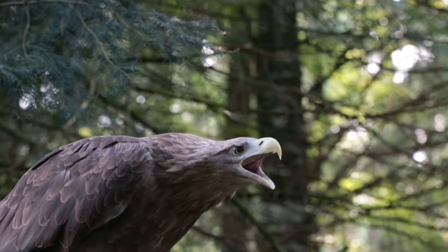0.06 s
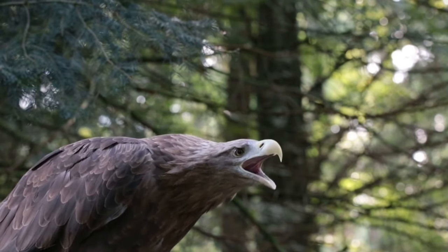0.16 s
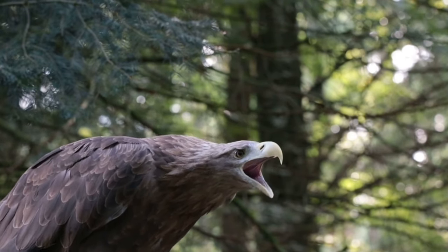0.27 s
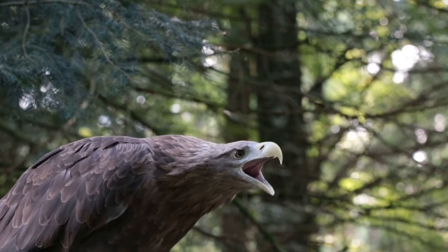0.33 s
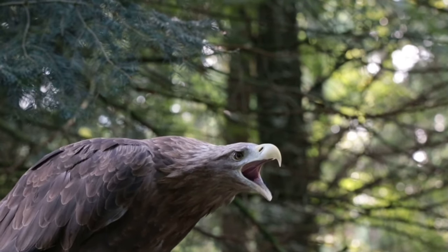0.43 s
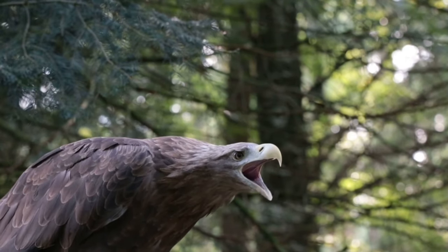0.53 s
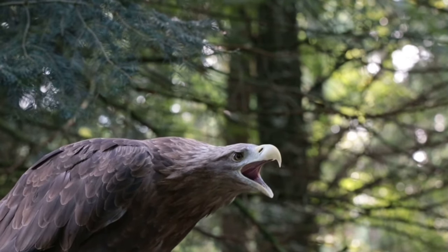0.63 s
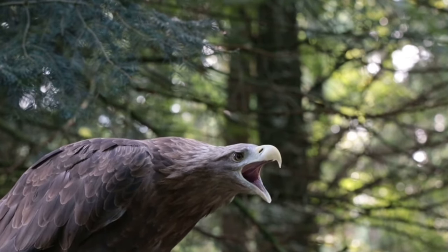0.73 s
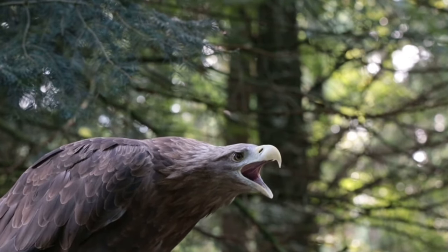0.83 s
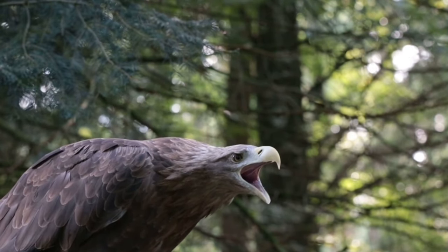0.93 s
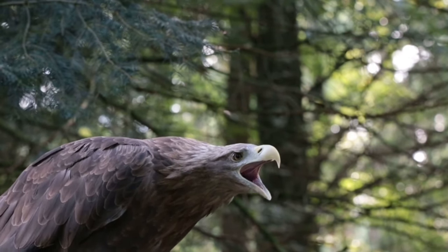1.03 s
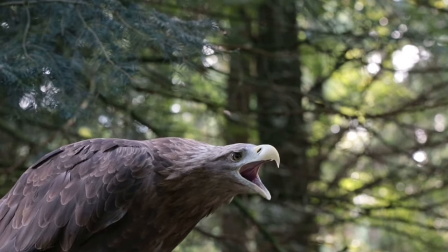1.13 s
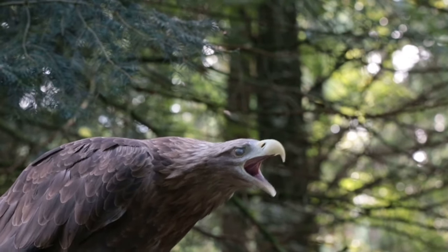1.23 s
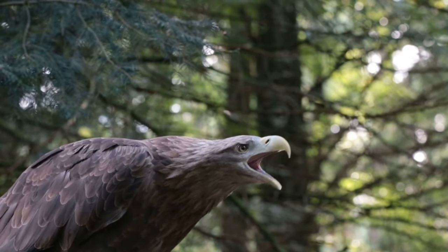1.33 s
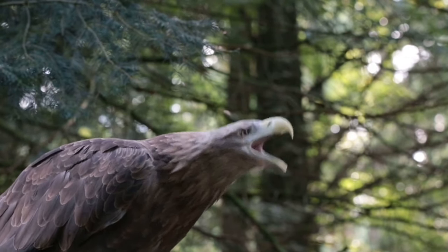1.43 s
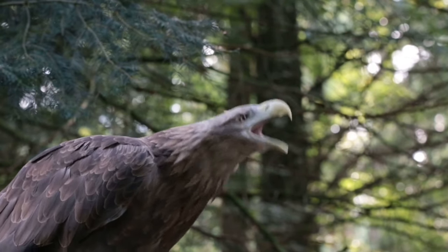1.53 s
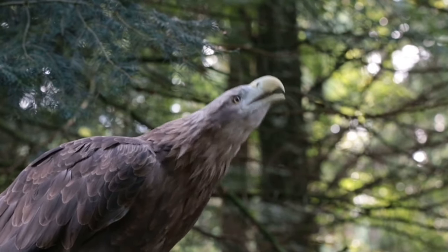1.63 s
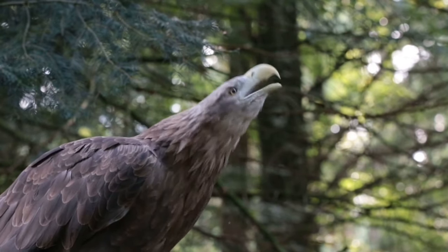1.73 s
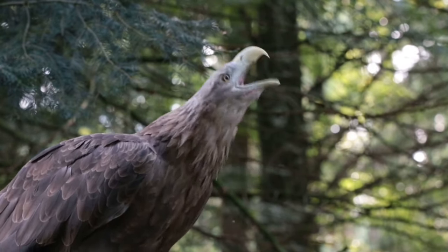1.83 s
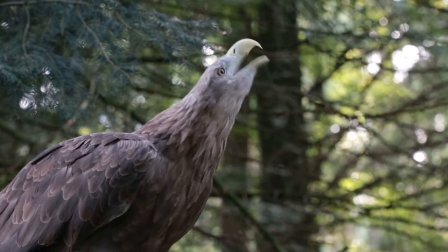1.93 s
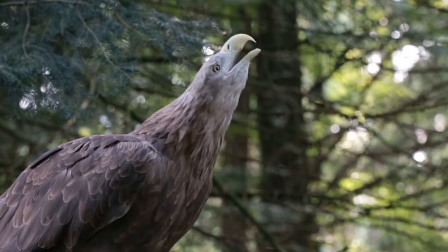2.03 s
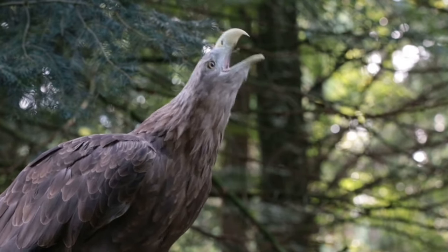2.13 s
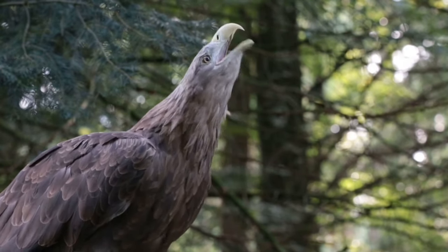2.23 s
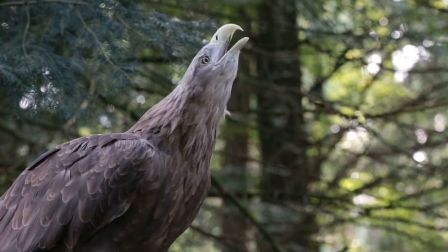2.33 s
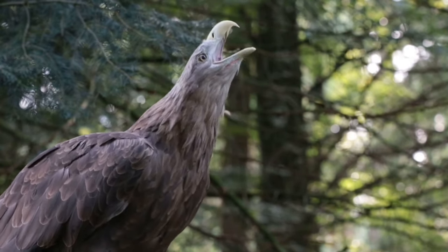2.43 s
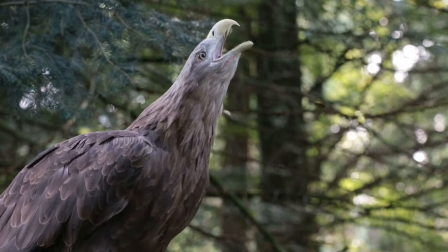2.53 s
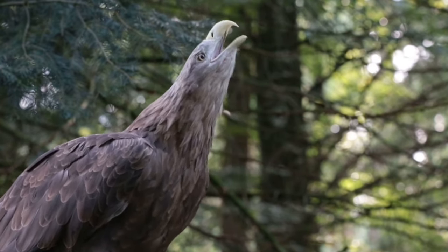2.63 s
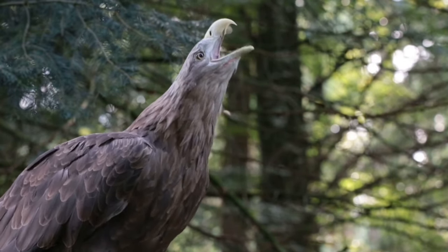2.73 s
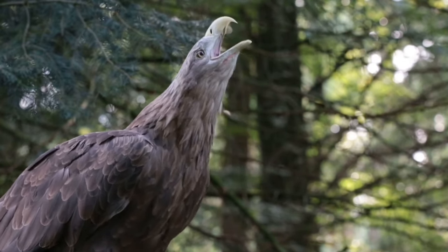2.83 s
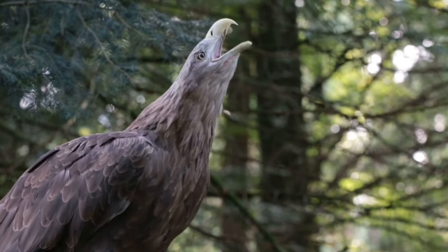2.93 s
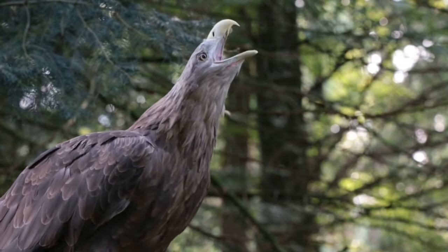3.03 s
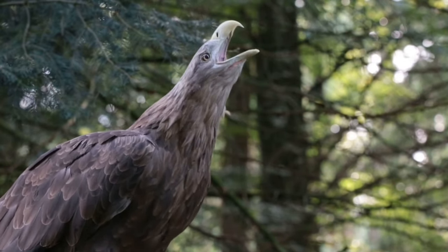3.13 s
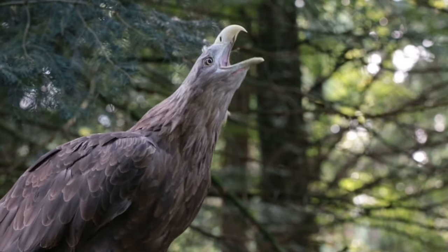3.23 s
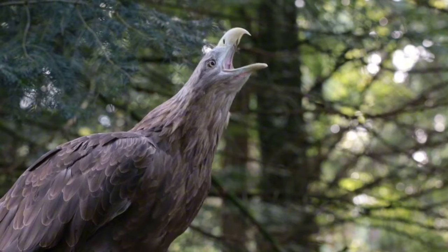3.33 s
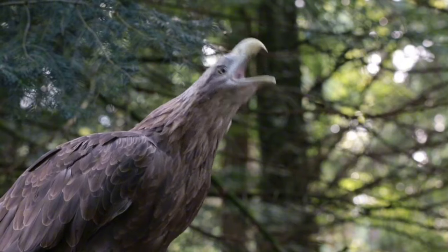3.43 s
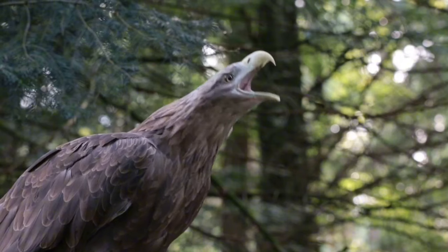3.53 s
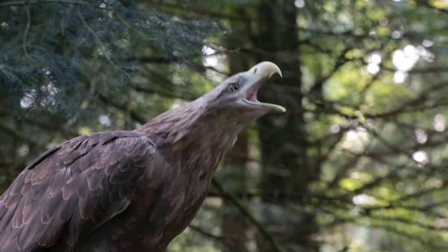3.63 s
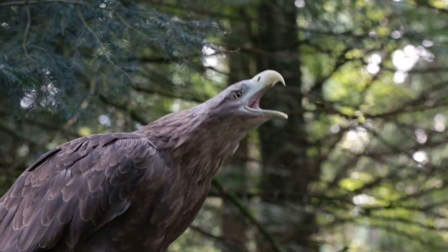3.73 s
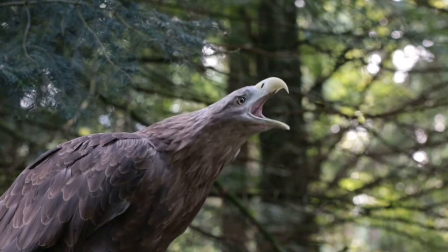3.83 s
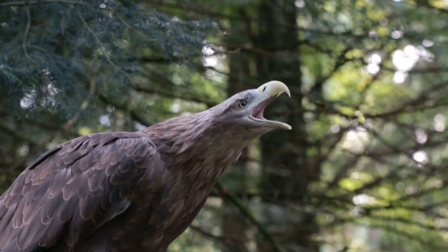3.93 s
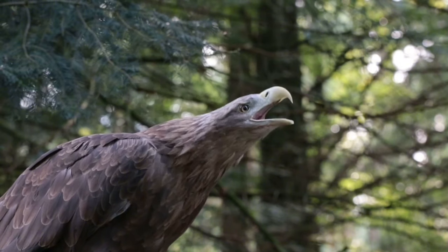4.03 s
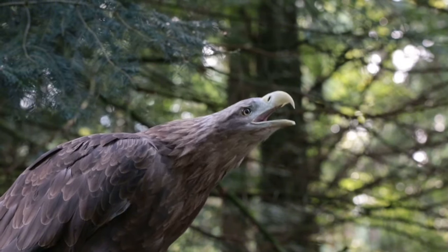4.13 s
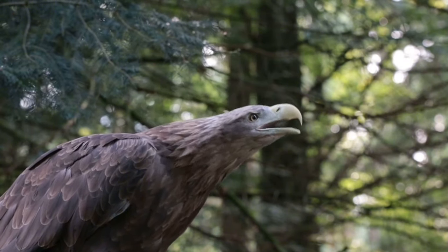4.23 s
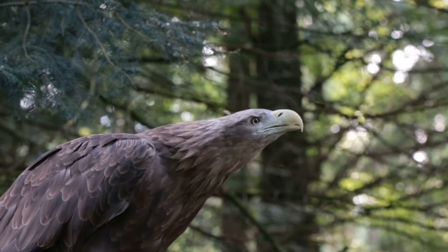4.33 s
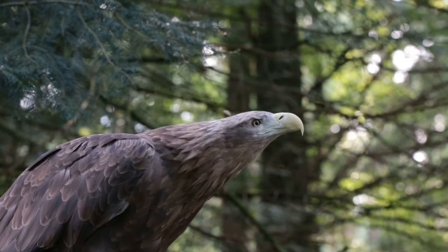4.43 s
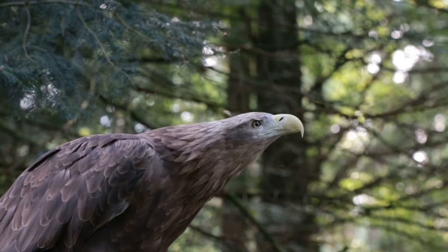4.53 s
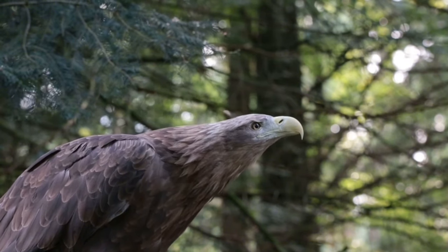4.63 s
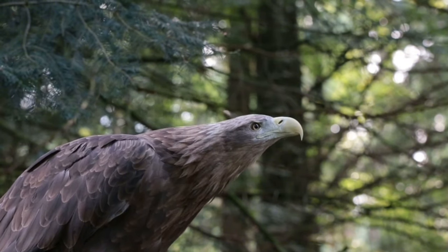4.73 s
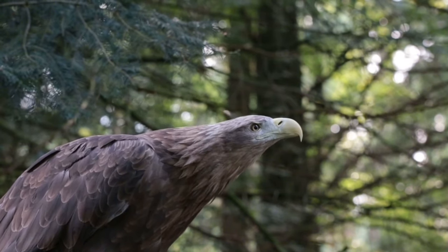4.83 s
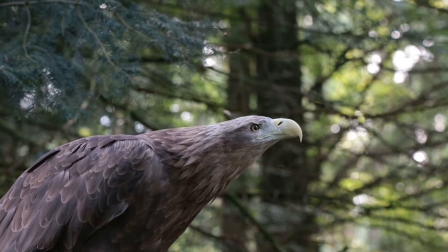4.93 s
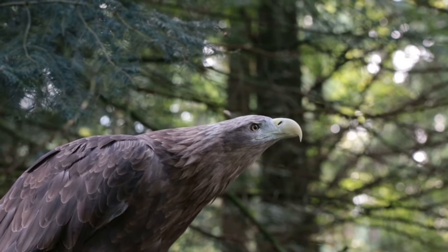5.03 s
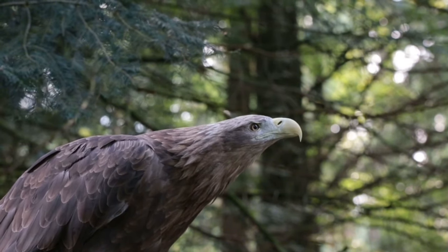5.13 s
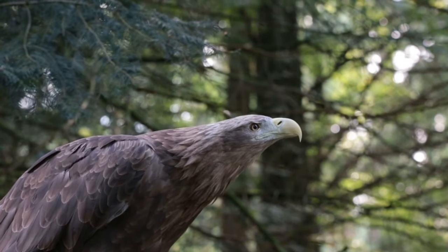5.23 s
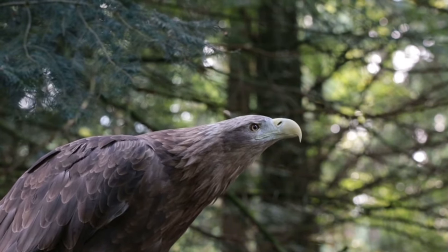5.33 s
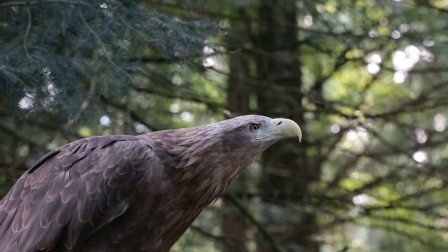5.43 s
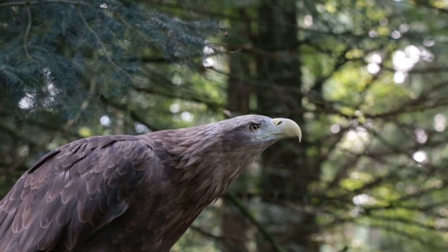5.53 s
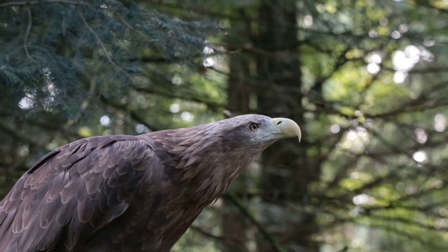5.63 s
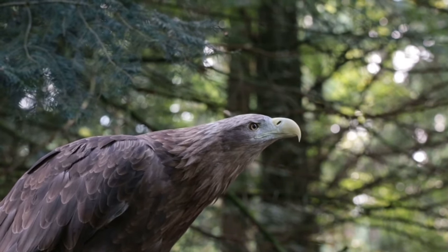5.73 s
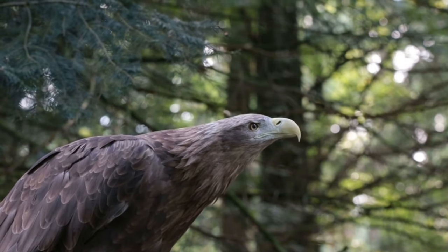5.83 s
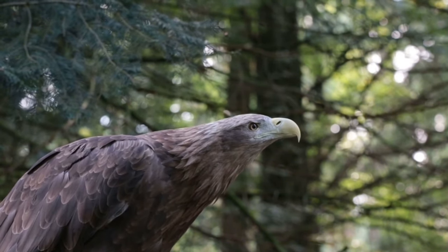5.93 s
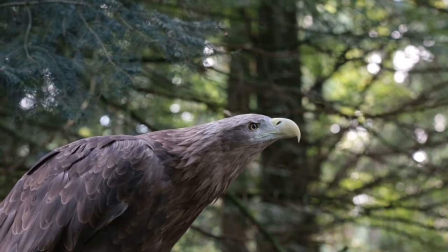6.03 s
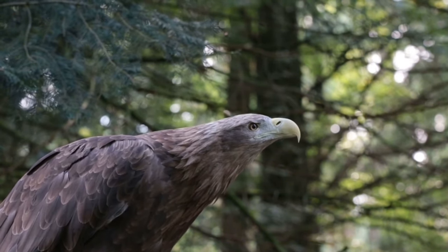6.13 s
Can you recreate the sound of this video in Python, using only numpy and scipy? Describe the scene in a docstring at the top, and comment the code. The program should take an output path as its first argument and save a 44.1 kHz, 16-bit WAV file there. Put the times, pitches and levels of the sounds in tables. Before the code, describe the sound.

Close to the microphone, a large bird of prey is already calling in a steady series of shrill, raspy yelps, each ringing briefly among the trunks. The notes slow slightly and grow hoarser midway, then finish with one quiet croak. The last couple of seconds hold only the soft hush of the wood, a very faint high insect and a few tiny dry scuffs.

```python
"""Eagle calling in a conifer wood

A perched eagle gives a run of sharp notes, already under way, and ends with a low croak. In each note
the vibrating syrinx climbs in a wavering squeal, breaks into purer yelps, then slackens into a rattle
of pulses that ring the throat. The beak's opening shapes the timbre, and the trees scatter the calls
into an echo. Afterwards come a few faint ticks and a thin insect over the hush of the wood."""
import sys
import numpy as np
from scipy import signal
from scipy.fft import rfft, irfft, next_fast_len
from scipy.io import wavfile
from scipy.ndimage import map_coordinates

SR = 44100
rng = np.random.default_rng(int(sys.argv[2]) if len(sys.argv) > 2 else 0)


def dump(signal):
    """Clip the signal to [-1, 1] and save it as 16-bit WAV at the path in sys.argv[1]."""
    limited = np.clip(np.atleast_2d(signal).T, -1, 1)
    pcm = np.round(limited * 32767).astype(np.int16)
    wavfile.write(sys.argv[1], SR, pcm)


N = 272083
SIZE = next_fast_len(N + SR)  # sounds begun before time zero wrap round from the spare end
HZ = np.fft.rfftfreq(SIZE, 1 / SR)
TOP_HZ = 15750

# Levels are relative within each table. "shut" and "open" mean a beak nearly shut and wide open.
HUSH_SPECTRUM = [(15, -72), (25, -42.5), (59, -25.5), (173, -31.5), (209, -14), (274, -16.5), (368, -8),
                 (567, -5), (631, 3), (762, 0.5), (1900, -16.5), (3440, -22.5), (7300, -33), (10100, -33),
                 (15500, -46)]  # distant air: frequency_hz, density_db
HUSH_COHERENCE = [(60, 0.84), (180, 0.34), (550, 0.56), (1650, 0.87), (4970, 0.31), (15000, 0.7)]  # likeness of left and right: frequency_hz, correlation
INSECT_LEVEL = [(4.2, -83), (4.65, -91), (4.85, -82.5), (5.4, -83), (5.55, -96), (6.15, -97.5)]  # insect's loudness: time_s, level_db
WOOD_DECAY = [(200, .5), (700, 0.25), (1500, 0.78), (3000, 0.63), (5000, 0.67), (10000, 0.21)]  # reverberation time of the trunks: frequency_hz, t60_s
WOOD_SPECTRUM = [(150, -13), (600, -2.5), (1500, -3.5), (3200, -2.5), (5000, -7.5), (9000, 7), (15000, -13)]  # colour of their echo: frequency_hz, gain_db
STEREO_BALANCE = [(300, 1), (800, 1), (1300, 4), (1700, 2), (2400, -1), (4400, -2.5), (8000, -1.5),
                  (15000, 0.5)]  # direct sound, left over right: frequency_hz, gain_db
STEREO_PHASE = [(200, 0), (1200, 0.014), (1700, -0.68), (3000, 1.6), (4800, -1.4), (8000, 0.65),
                (15000, 0.94)]  # direct sound, lead of the left: frequency_hz, phase_rad
TICKS = [(4.787, 0.0051, -62, 2390, 0.44), (4.859, 0.032, -59.5, 2026, 0.8), (5.457, 0.018, -52, 744, 1.16),
         (5.467, 0.0097, -55, 990, 1.6)]  # dry scuffs: start_s, length_s, level_db, centre_hz, width_octaves

BEAK_OPENING = [(.2, 1), (1.45, 0.89), (1.63, 0.36), (2, 0.07), (2.9, 0.13), (3.23, 0.32), (3.55, 0.6),
                (3.8, .85), (4.08, 0.89), (4.35, 0.06)]  # 0 is shut, 1 is open: time_s, opening_share
RASP_SPECTRUM = [(100, -49.5), (600, -13.5), (1500, 3), (3500, 3), (5000, -8), (8000, -20.5), (10500, -30),
                 (15500, -34)]  # breath noise: frequency_hz, density_db
HOARSENESS = [(.2, -19), (.5, -17.5), (1.45, -13.5), (1.75, -11.5), (3.2, -10.5), (3.8, -9.5), (4.1, -19)]  # breath noise in proportion to the voice: time_s, level_db
RATTLES = [(.487, 0.041, -38), (.72, 0.041, -42.5), (.956, 0.043, -39.5), (1.197, 0.035, -36.5),
           (1.433, 0.033, -36), (1.734, 0.041, -32), (2.054, 0.044, -36), (2.356, 0.058, -37),
           (2.661, 0.057, -37), (2.963, .05, -36), (3.255, 0.044, -34), (3.576, 0.031, -34.5),
           (3.824, 0.015, -34.5), (4.082, 0.014, -33.5)]  # pulse trains that end the notes: start_s, length_s, level_db
CROAK = [(4.362, 0.0266, -62.5), (4.397, 0.032, -50.5), (4.425, 0.008, -47)]  # a soft start and two pushes: start_s, length_s, level_db
RATTLE_ENVELOPE = [(0, -1.5), (.3, -0.5), (.55, 2), (.85, -1), (1, -4.5), (1.25, -19), (1.5, -89.5)]  # swell and fade of a pulse train: length_share, level_db
PULSE_SPECTRUM = [(30, -49), (150, -41), (210, -21.5), (450, -12), (850, 1), (1250, 1), (1800, -5.5),
                  (2500, -16), (3600, -19.5), (4800, -32.5), (8000, -44.5), (15000, -70)]  # one throat pulse: frequency_hz, level_db
RATTLE_FORMANTS = [(888, 100, 4.5), (1368, 69, 8.5), (1682, 320, 10), (3160, 300, 7.5)]  # throat resonances: centre_hz, width_hz, boost_db
CROAK_FORMANTS = [(832.3, 210, 8), (1380, 140, 11), (1847, 280, 19.5), (3350, 880, 18), (6300, 4000, -24)]  # the same, beak nearly shut: centre_hz, width_hz, boost_db

SQUEAKS = [(1.711, 0.0096, -35), (2.03, .011, -41.5)]  # whistles leading into a yip: start_s, length_s, level_db
YIPS = [(.513, .0036, 1722, -16.5), (.75, 0.0023, 1797, -15), (.99, .0039, 1697, -23),
        (1.225, .005, 1740, -20.5), (1.464, 0.0023, 1773, -17.5), (1.723, 0.01, 1818, -15),
        (2.042, .0046, 1872, -18.5), (2.049, 0.0061, 1770, -25.5), (2.344, .0044, 1765, -16),
        (2.35, .006, 1770, -23.5), (2.647, 0.013, 1765, -21.5), (2.95, 0.015, 1716, -18),
        (3.238, 0.019, 1578, -20), (3.264, .0054, 1730, -25.5), (3.57, .0074, 1607, -19),
        (3.592, .0053, 1630, -22.5)]  # brief high breaks near a rattle: start_s, length_s, pitch_hz, level_db
SLURS = [(.235, 0.026, 1310, -32), (.489, .011, 1480, -27.5), (.727, 0.012, 1500, -31),
         (.966, 0.012, 1595, -25.5), (1.205, 0.0081, 1580, -25), (1.443, 0.0061, 1650, -23),
         (3.822, .017, 1395, -33), (4.08, .016, 1397, -33)]  # the voice catches and slides down: start_s, length_s, pitch_hz, level_db
# Squeals, each topped by a yelp: start_s, climb_s, top_pitch_hz, yelp_length_s, yelp_level_db
NOTES = [(-.105, 0.032, 1544, .029, -24), (0.175, .03, 1381, 0.038, -24.5), (.435, 0.037, 1592, 0.017, -21),
         (0.674, 0.035, 1625, .013, -21), (.913, 0.033, 1590, 0.016, -19), (1.151, .033, 1608, .016, -17.5),
         (1.387, .031, 1594, 0.018, -18.5), (1.624, 0.03, 1299, .01, -28), (1.962, 0.034, 1646, .012, -17),
         (2.292, .03, 1662, .014, -16), (2.595, .028, 1627, 0.018, -17), (2.898, 0.03, 1591, 0.02, -17.5),
         (3.192, .029, 1602, 0.018, -15.5), (3.514, 0.032, 1604, 0.025, -18.5),
         (3.758, .029, 1580, 0.041, -21), (4.011, 0.028, 1560, 0.049, -23)]
YELP_ARCH = [(1, 0.96), (1, 0.98), (0.95, .935)]  # start, middle and end pitch against the top: shut_ratio, open_ratio
OVERTONE_SPECTRUM = [(4000, 4.5), (5200, 9), (6300, -4), (8000, -9), (9500, -23), (11000, -43),
                     (15500, -39)]  # envelope of harmonics above the 3rd: frequency_hz, level_db
# The 2nd, 3rd and all higher harmonics against the fundamental, a row each: shut_db, open_db
YIP_TONE = [(-7.5, -2), (-29, -24), (-35.5, -35)]
SLUR_TONE = [(-16, -0.5), (-20, 1.5), (-38, -10)]
YELP_TONE = [(-13.5, -2), (-41, -10.5), (-41.5, -17.5)]
SQUEAL_TONE = [(-15, 3), (-17.5, 2), (-43, -10)]

# Pitch contours: start, middle, end
SQUEAK_HZ = (4540, 4150, 3800)
YIP_ARCH, SLUR_FALL = (1, .99, .95), (1, .92, .73)  # ratios to pitch_hz
# Settings that follow the beak: shut, open
AIR_TO_TREES_DB = (11, 2.5)  # the head is raised when the beak is shut, throwing hiss into the trees
YELP_SNAP_DB, YELP_BRIGHTEN_DB, YELP_SKEW = (-1.5, 7.5), (-2, 6.5), (1.3, .7)
SQUEAL_WAVER, SQUEAL_ONSET_DB, SQUEAL_TILT_DB = (.103, .042), (-15.5, -2), (-7.5, 4.5)


def amp(db):
    """Amplitude ratio of a level in decibels."""
    return 10 ** (np.asarray(db) / 20)


def unit(x):
    """Normalisation to an rms of 1."""
    return x / np.sqrt(np.mean(x ** 2) + 1e-20)


def curve(points, x):
    """Linear interpolation in a two-column table."""
    return np.interp(x, *np.transpose(points))


def along(points, hz):
    """Interpolation on a logarithmic frequency axis."""
    knots_hz, values = np.transpose(points)
    return np.interp(np.log(hz + 1), np.log(knots_hz + 1), values)


def filtered(x, response):
    """Circular convolution: the spectrum of x times a response given on HZ."""
    return irfft(rfft(x, SIZE) * response, SIZE)


def smoothed(x, decay_s):
    """A first-order low-pass gives every impulse an exponential tail."""
    return filtered(x, 1 / (1 + 2j * np.pi * HZ * decay_s))


def minimum_phase(gain):
    """Folding the cepstrum gives a causal response with this gain."""
    cepstrum = irfft(np.log(gain), SIZE)
    cepstrum[1:SIZE // 2] *= 2
    cepstrum[SIZE // 2 + 1:] = 0
    return np.exp(rfft(cepstrum))


def band_gain(response):
    """The rms gain of a response in the band of the calls."""
    return np.sqrt(np.mean(abs(response[:, (HZ > 1000) & (HZ < 4000)]) ** 2))


def wobble(count, rate_hz):
    """Smooth random modulation: a spline through rate_hz knots a second."""
    return map_coordinates(rng.standard_normal(4096), [np.arange(count) * rate_hz / SR], mode="wrap")


def add(track, start_s, sound):
    """Superposition of a sound on a track."""
    track[(round(start_s * SR) + np.arange(len(sound))) % SIZE] += sound


def gate(length_s, edge_s):
    """A raised-cosine window reaching edge_s past each end; returns time and envelope."""
    t = np.arange(-edge_s, length_s + edge_s, 1 / SR)
    ramp = np.clip((np.minimum(t, length_s - t) + edge_s) / (2 * edge_s), 0, 1)
    return t, np.sin(np.pi / 2 * ramp) ** 2


def noise_pair(count, spread, treble=.24):
    """Noise at two close points loses coherence as the wavelength shortens."""
    mid, side = rng.standard_normal((2, count))
    side = spread * side + treble * np.diff(side, prepend=0)
    return np.array([mid + side, mid - side])


def hush(level_db):
    """Distant air in the trees makes partly coherent noise whose level drifts slowly."""
    angle = np.arccos(np.clip(along(HUSH_COHERENCE, HZ), -1, 1)) / 2
    spectra = amp(along(HUSH_SPECTRUM, HZ)) * np.array([np.cos(angle), np.sin(angle)])
    mid, side = filtered(rng.standard_normal((2, SIZE)), spectra)
    return amp(level_db + .6 * wobble(SIZE, 2)) * unit(np.array([mid + side, mid - side]))


def insect(period_s=.081, pair_gap_s=.017, centre_hz=10200, half_width_hz=420):
    """An insect ticks in pairs: amplitude modulation of a high, narrow band of noise."""
    pulses = np.zeros(SIZE)
    _, envelope = gate(.0054, edge_s=.003)
    for start_s in np.arange(.031, N / SR, period_s):
        for lag_s in (0, pair_gap_s):
            add(pulses, start_s + lag_s, envelope * amp(curve(INSECT_LEVEL, start_s) + rng.normal(0, 1.5)))
    band = 1 / (1 + ((HZ - centre_hz) / half_width_hz) ** 2)
    return pulses * unit(filtered(rng.standard_normal(SIZE), band))


def wood_echo(x, near_db, far_db, near_t60_s=.3, build_s=.0067):
    """Reverberation by scattering: nearby branches answer at once, farther trunks give a long tail."""
    hz, t, spectra = signal.stft(noise_pair(SR, spread=.22), SR, nperseg=256)
    decay = amp(-60 * t / along(WOOD_DECAY, hz)[:, None])
    _, tail = signal.istft(spectra * decay * (1 - np.exp(-t / build_s)), SR, nperseg=256)
    far = rfft(tail, SIZE)
    far *= amp(along(WOOD_SPECTRUM, HZ)) / band_gain(far)
    t = np.arange(SR // 4) / SR
    near = rfft(noise_pair(len(t), spread=.098) * amp(-60 * t / near_t60_s) * (t > .003), SIZE)
    return filtered(x, amp(far_db) * far + amp(near_db) * near / band_gain(near))


def ticks():
    """Small dry scuffs near the perch are short bursts of band-limited noise."""
    track = np.zeros(SIZE)
    for start_s, length_s, level_db, centre_hz, width_octaves in TICKS:
        t, envelope = gate(length_s, edge_s=length_s / 3)
        hz = np.fft.rfftfreq(len(t), 1 / SR)
        band = 1 / (1 + (np.log2((hz + 1) / centre_hz) / width_octaves) ** 4)
        noise = irfft(rfft(rng.standard_normal(len(t))) * band, len(t))
        add(track, start_s + t[0], amp(level_db) * envelope * unit(noise))
    return track


def gape(time_s):
    """The opening of the beak, from 0 to 1."""
    return np.clip(curve(BEAK_OPENING, time_s), 0, 1)


def by_beak(pairs, time_s):
    """Interpolation between (shut, open) values as the beak stands at time_s."""
    shut, wide = np.transpose(pairs)
    return shut + (wide - shut) * gape(time_s)


def rasp(voice, flaps, linger_s=.0092, puff_db=-48):
    """Airflow noise follows the voice's envelope and lingers; each note also pushes out a low puff."""
    flow = smoothed(abs(voice + flaps), linger_s)
    hoarseness = amp(curve(HOARSENESS, np.arange(SIZE) / SR))
    hiss = filtered(hoarseness * flow * noise_pair(SIZE, spread=.2), amp(along(RASP_SPECTRUM, HZ)))
    puff_band = 1j * HZ / (100 + 1j * HZ) / (1 + (HZ / 170) ** 2)
    return hiss + amp(puff_db) * filtered(abs(voice), puff_band)


def rattles(rows, formants, rate_hz, scatter, shut_db, gush, gape_db=11, spread_db=2.5, gain_db=8):
    """Source and filter: the slack syrinx flaps in uneven pulses that excite the throat's resonances."""
    pulses, treble = np.zeros((2, SIZE))
    for start_s, length_s, level_db in rows:
        bright_db = shut_db + gape_db * gape(start_s)
        bass = amp(-max(bright_db, 0))  # an open beak is brighter and holds less bass
        gaps, sizes = rng.standard_normal((2, 24))
        times = .00082 + (np.cumsum(1 + scatter * gaps) - 1) / rate_hz
        pushes = amp(level_db + spread_db * sizes + curve(RATTLE_ENVELOPE, times / length_s))
        for t, push in zip(times, pushes):
            add(pulses, start_s + t, [push * bass])
            add(treble, start_s + t, [push * (amp(bright_db) - bass)])
    pulses += filtered(treble, (1j * HZ / (1800 + 1j * HZ)) ** 2)
    boost_db = sum(db / (1 + (2 * (HZ - centre) / width) ** 2) for centre, width, db in formants)
    throat = minimum_phase(amp(along(PULSE_SPECTRUM, HZ) + boost_db))
    throat *= amp(gain_db) * np.sqrt(SR / rate_hz / np.mean(abs(throat) ** 2))
    air = gush * smoothed(pulses, decay_s=.0027) * rng.standard_normal(SIZE)  # follows every flap
    return filtered(pulses + air, throat)


def squeaks():
    """A falling pure tone slips out as a thin whistle before the voice catches."""
    track = np.zeros(SIZE)
    for start_s, length_s, level_db in SQUEAKS:
        t, envelope = gate(length_s, edge_s=.002)
        pitch_hz = np.interp(t, np.linspace(0, length_s, len(SQUEAK_HZ)), SQUEAK_HZ)
        whistle = np.sqrt(2) * np.sin(2 * np.pi * np.cumsum(pitch_hz) / SR)
        add(track, start_s + t[0], amp(level_db) * envelope * whistle)
    return track


def syrinx(pitch_hz, level_db, tone, jitter, shimmer_db, bright):
    """Nearly periodic vibration gives a harmonic series, with jitter in pitch and shimmer in level."""
    count = len(pitch_hz)
    second_db, third_db, upper_db = tone
    phase = 2 * np.pi * np.cumsum(pitch_hz * (1 + jitter * wobble(count, 900))) / SR
    harmonics = np.arange(1, 15)[:, None]
    upper_hz = harmonics[3:] * pitch_hz
    upper = amp(along(OVERTONE_SPECTRUM, upper_hz)) * (upper_hz < TOP_HZ)
    upper *= amp(upper_db) / np.sqrt(np.mean(np.sum(upper ** 2, axis=0)))
    gains = np.vstack([amp([[0], [second_db], [third_db]]) * np.ones(count), upper])
    gains[1:] *= bright
    shimmer = amp(shimmer_db * np.array([wobble(count, 140) for _ in harmonics]))
    return amp(level_db) * np.sqrt(2) * np.sum(gains * shimmer * np.sin(harmonics * phase), axis=0)


def glide(contour_hz, length_s, level_db, tone, brighten_db, skew=.8, quaver=.0042, throb_db=1.2):
    """A quavering tone on a parabolic pitch contour; returns its time offset and its sound."""
    t, envelope = gate(length_s, edge_s=.0024)
    progress = np.clip(t / length_s, 0, 1)
    pitch_hz = np.polyval(np.polyfit([0, .5, 1], contour_hz, 2), progress)
    pitch_hz *= 1 + quaver * wobble(len(t), 160)
    brevity = 1 / (1 + (length_s / .025) ** 4)  # brief tones swell, long ones hold
    swell_db = 8 * brevity * (np.sin(np.pi * progress ** skew) ** 2 - .94)  # low skew peaks early
    envelope *= amp(swell_db + throb_db * wobble(len(t), 190))
    bright = amp(brighten_db * brevity * (progress - .5))
    sound = syrinx(pitch_hz, level_db, tone, jitter=.002 + .012 * brevity, shimmer_db=2.12, bright=bright)
    return t[0], envelope * sound


def voice_breaks(rows, contour, tone, brighten_db=0):
    """The voice cracks after the yelp into short harmonic glides of one pitch shape."""
    track = np.zeros(SIZE)
    for start_s, length_s, pitch_hz, level_db in rows:
        contour_hz = pitch_hz * np.array(contour)
        offset_s, sound = glide(contour_hz, length_s, level_db, by_beak(tone, start_s), brighten_db)
        add(track, start_s + offset_s, sound)
    return track


def yelps(overlap_s=.003, snap_at_s=.0033, snap_width_s=.0012, droop_db_per_s=90):
    """Each squeal pops into an arched, fading tone, purer as its pitch nears the throat's resonance."""
    track = np.zeros(SIZE)
    for start_s, climb_s, top_hz, length_s, level_db in NOTES:
        purity = np.interp(top_hz, (1330, 1555), (0, 1))
        tone = purity * by_beak(YELP_TONE, start_s) + (1 - purity) * by_beak(SQUEAL_TONE, start_s)
        offset_s, sound = glide(top_hz * by_beak(YELP_ARCH, start_s), length_s, level_db, tone,
                                by_beak(YELP_BRIGHTEN_DB, start_s), by_beak(YELP_SKEW, start_s))
        t = offset_s + np.arange(len(sound)) / SR
        snap = np.exp(-((t - snap_at_s) / snap_width_s) ** 2)
        gain_db = purity * by_beak(YELP_SNAP_DB, start_s) * snap - droop_db_per_s * (t - length_s / 2)
        add(track, start_s + climb_s - overlap_s + offset_s, sound * amp(gain_db))
    return track


def squeals(start_hz=984, climb_hz_per_s=14800, level_db=-28, waver_hz=112, onset_s=.005):
    """Frequency modulation: a damped waver, set off by the attack, makes the pitch climb in steps."""
    track = np.zeros(SIZE)
    for start_s, climb_s, top_hz, _, _ in NOTES:
        t, envelope = gate(climb_s, edge_s=.0022)
        progress = t / climb_s
        depth = by_beak(SQUEAL_WAVER, start_s)
        waver = -np.cos(2 * np.pi * waver_hz * (t - .0037)) * np.exp(-t / .028)
        end_hz = min(start_hz + climb_hz_per_s * climb_s, top_hz * by_beak(YELP_ARCH, start_s)[0])
        pitch_hz = (start_hz + (end_hz - start_hz) * progress) * (1 + 2.04 * depth * waver)
        onset = amp(by_beak(SQUEAL_ONSET_DB, start_s) / (1 + (np.maximum(t, 0) / onset_s) ** 6))
        throb_db = 550 * depth ** 2 * waver
        envelope *= onset * amp(throb_db + by_beak(SQUEAL_TILT_DB, start_s) * (progress - .5))
        # overtones come in just after the fundamental; a strongly wavering squeal soon loses them
        bright = np.sqrt(onset) * amp(130 * depth * (.9178 - np.maximum(progress, .25)))
        tone = by_beak(SQUEAL_TONE, start_s)
        sound = syrinx(pitch_hz, level_db, tone, jitter=.0045, shimmer_db=3, bright=bright)
        add(track, start_s + t[0], envelope * sound)
    return track


def scene():
    """The bird's direct sound, its echo and the background superpose at two close listening points."""
    voice = squeals() + yelps()
    # a slur's overtones grow as they slide down into the beak's resonance
    voice += voice_breaks(SLURS, SLUR_FALL, SLUR_TONE, brighten_db=9.5)
    voice += voice_breaks(YIPS, YIP_ARCH, YIP_TONE) + squeaks()
    flaps = rattles(RATTLES, RATTLE_FORMANTS, rate_hz=195, scatter=.17, shut_db=-1, gush=5.5)
    flaps += rattles(CROAK, CROAK_FORMANTS, rate_hz=165, scatter=.023, shut_db=-3, gush=2.6)
    perch = voice + flaps + ticks()
    air = rasp(voice, flaps)
    sides = np.array([[.5], [-.5]])
    stereo = amp(sides * along(STEREO_BALANCE, HZ)) * np.exp(1j * sides * along(STEREO_PHASE, HZ))
    thrown_air = air.mean(axis=0) * amp(by_beak(AIR_TO_TREES_DB, np.arange(SIZE) / SR))
    echo = wood_echo(perch + thrown_air, near_db=-13.5, far_db=-13)
    return filtered(perch + air, stereo) + echo + insect() + hush(level_db=-64)


def record(dry):
    """An ideal low-pass removes everything above TOP_HZ."""
    return filtered(dry, HZ < TOP_HZ)[:, :N]


dry = scene()
out = record(dry)
dump(out)
```